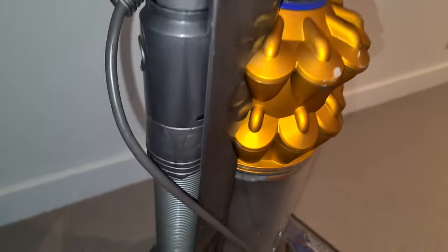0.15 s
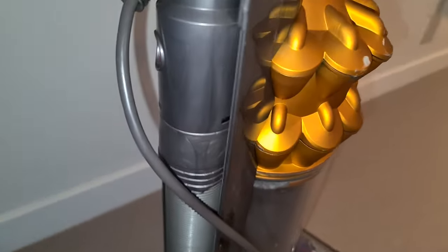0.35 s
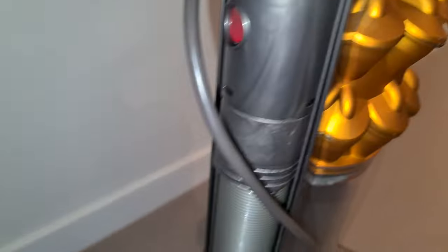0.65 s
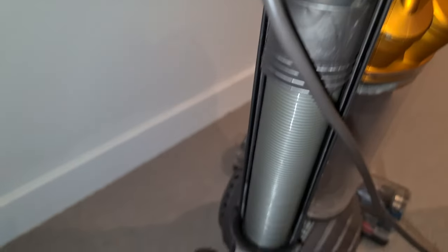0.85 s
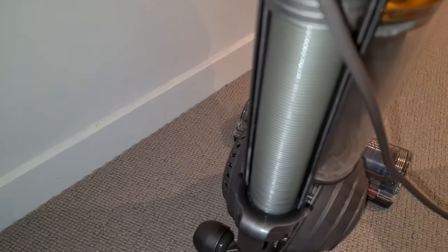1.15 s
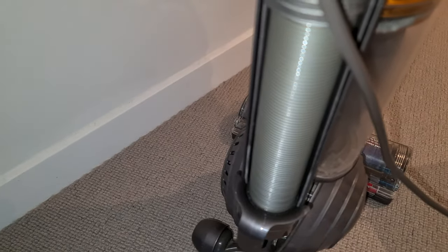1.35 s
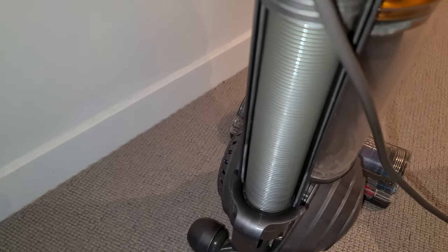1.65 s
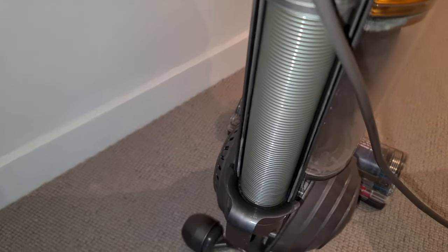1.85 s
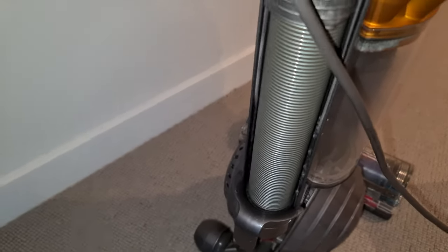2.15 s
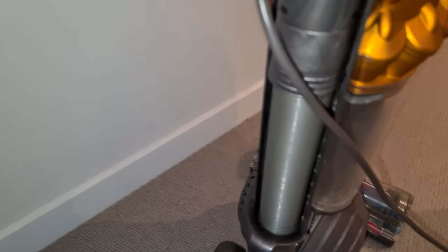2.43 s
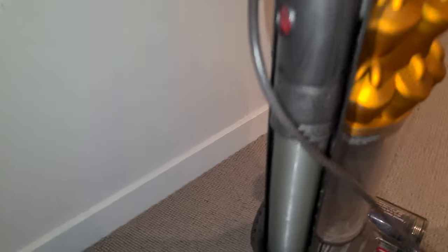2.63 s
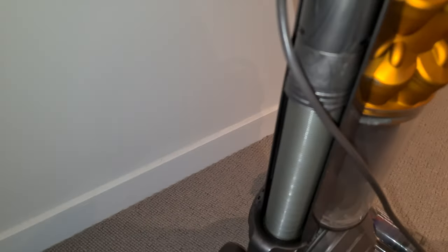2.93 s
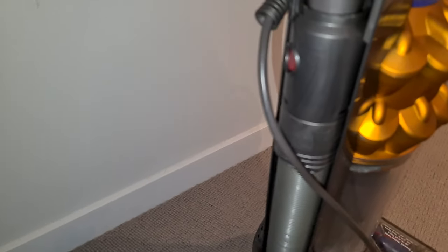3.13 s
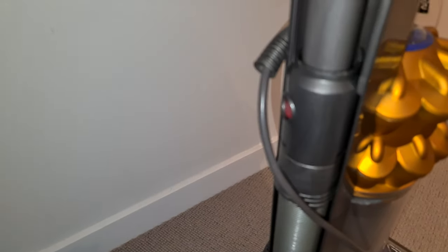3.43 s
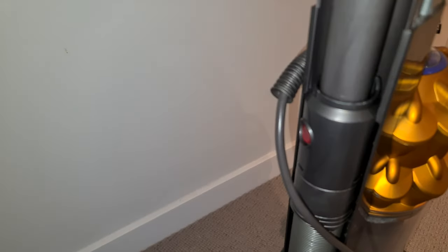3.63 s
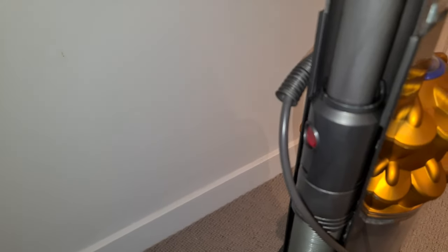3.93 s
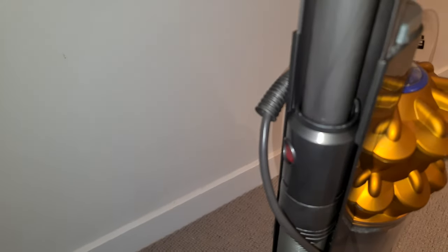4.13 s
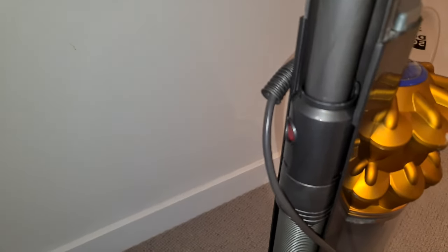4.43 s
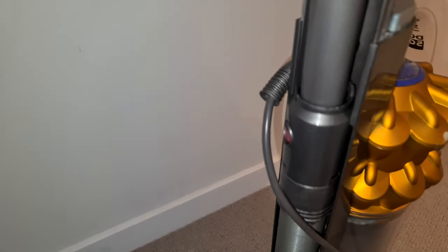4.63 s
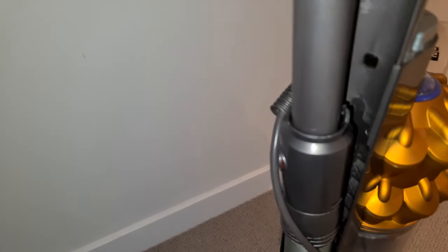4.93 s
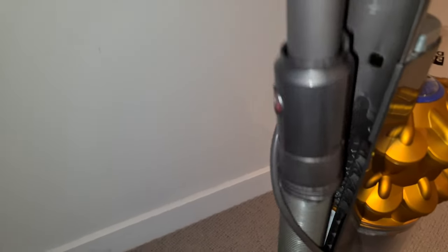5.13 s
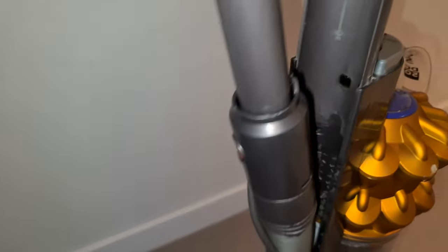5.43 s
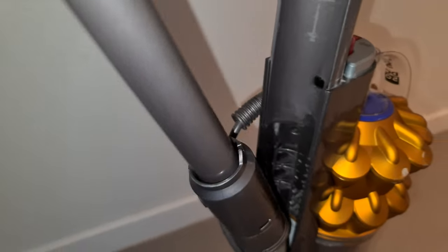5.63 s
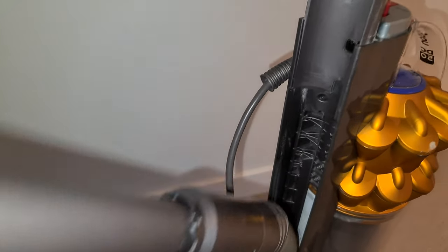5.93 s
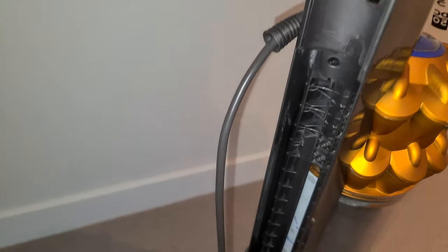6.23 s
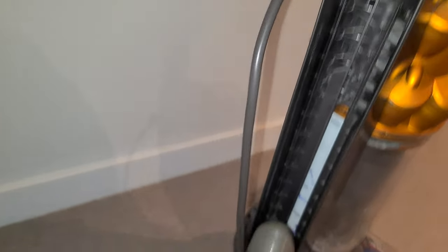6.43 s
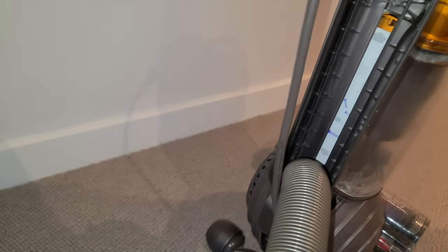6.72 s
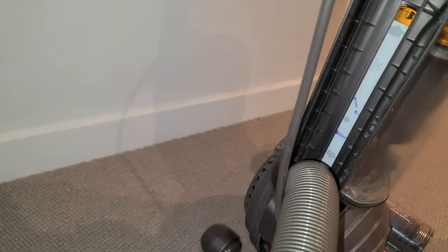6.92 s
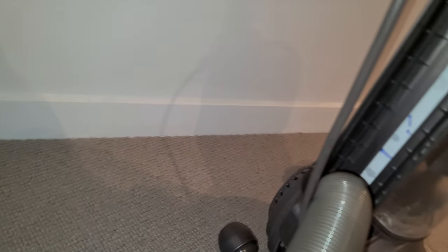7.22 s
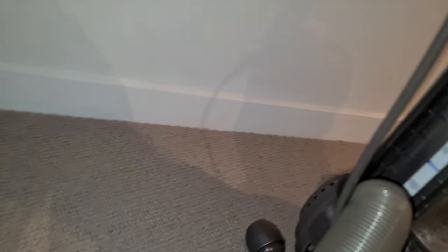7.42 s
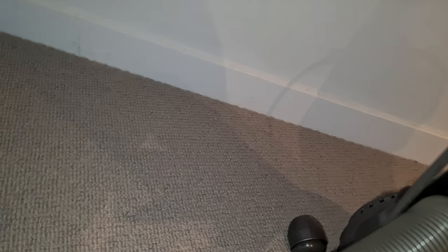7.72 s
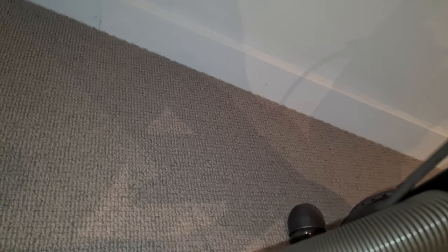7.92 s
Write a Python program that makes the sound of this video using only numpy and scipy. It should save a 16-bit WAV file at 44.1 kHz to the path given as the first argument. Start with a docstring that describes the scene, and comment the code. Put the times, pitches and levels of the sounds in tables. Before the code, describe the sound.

A switched-off upright vacuum cleaner is handled close to two microphones in a small carpeted room, with a faint low rumble and wavering hum throughout. From 0 to 2 seconds there are only sparse light plastic ticks and barely audible rubs. At about 2.1 the ribbed hose slides with a dry, grainy hiss lasting under half a second, with clicks, ending in sharp knocks near 2.4 to 2.5. Between 2.7 and 3.1 comes the busiest burst: hard hollow clacks, short scraping strokes, shuddering housing and low booms. Small ticks and soft rubs continue from 3.2 to 4.5. Around 4.55 to 4.6 a catch snaps open in a rapid cluster of bright cracks, ringing and rattling. At 5.15 a heavy plastic clunk booms and chatters briefly. Scattered light taps follow until about 7.5, then mostly quiet hum to 8 seconds.

```python
"""The wand of an upright vacuum cleaner, handled close to two microphones in a small carpeted room, motor off.
It scrapes and clunks in its plastic channel, unlatches and comes free: noise-driven knocks ring housing and tube.
The ribbed hose, nearest and driest, slides with a hiss of stick-slip noise.
Loose parts tick between the moves and chatter after jolts; the bin booms as short low sines.
Behind it lie a low rumble of filtered noise and two wavering hums."""
import sys
import numpy as np
from scipy import signal
from scipy.fft import rfft, irfft, next_fast_len
from scipy.io import wavfile

SR = 44100
rng = np.random.default_rng(int(sys.argv[2]) if len(sys.argv) > 2 else 0)


def digitize_waveform(pressure):
    """Quantize a signal to 16-bit integers and store it at the path in sys.argv[1].

    Rows of a 2-D input are taken as channels; values are limited to [-1, 1].
    """
    field = np.atleast_2d(pressure).T
    bounded = np.clip(field, -1, 1)
    quanta = np.round(bounded * 32767).astype(np.int16)
    wavfile.write(sys.argv[1], SR, quanta)


N = 355887
TIME = np.arange(N) / SR

# Event levels below are relative: each layer's gain and the room come later. Positive pan_db leans left.
# steady rumble: pitch_hz, density_db (per Hz)
RUMBLE_COLOUR = [(20, -13), (50, 0), (80, 0), (115, -6), (160, -9), (250, -18), (400, -27.5), (700, -36),
                 (1500, -41), (4000, -46.5), (6500, -62), (16000, -65)]
RUMBLE_DB, HUM_HZ, HUM_DB = -55.5, 100.9, -54.5  # levels before the swell
# slow swell of the low background: time_s, gain_db
RUMBLE_SWELL = [(0, 0.5), (1.5, 2), (2.8, 3), (3.4, -5), (4.5, -2.5), (6.2, -3.5), (6.9, 1.5), (8.1, -0.5)]
# likeness of the two microphones: pitch_hz, likeness (0-1)
MIC_LIKENESS = [(60, 1), (200, 0.7), (500, 0.8), (1200, 0.4), (3000, 0.4), (12000, 0.25)]
# decay of the room: pitch_hz, t60_s
ROOM_T60 = [(100, .35), (300, .45), (1000, .4), (3500, .46), (7000, .38), (13000, .33)]
# strength of the reverberation: pitch_hz, gain_db
ROOM_COLOUR = [(100, -12.5), (300, -5), (1000, -11), (2200, -9), (4200, -14.5), (7000, -11), (13000, -16.5)]
# modes of the hollow housing: pitch_hz, level_db, t60_s
HOUSING_MODES = [(182, -6, 0.13), (242, -3, .35), (302.2, -7, .3), (394.7, -8, .3), (587, -8, .2),
                 (750, -10, 0.23), (809, -4.5, 0.086), (984, -5, .25), (1230, -4.5, 0.14),
                 (1290, -6.5, 0.04), (1520, -4.5, .12), (1590, -6.5, .22), (1896, -4, 0.17)]
# modes of the wand's tube: pitch_hz, level_db, t60_s
TUBE_MODES = [(1772, -11, 0.35), (2100, -4.5, 0.36), (2190, -4.5, 0.28), (2241, -2.5, 0.34),
              (2410, -1.5, 0.08), (2780, -5.5, 0.3), (3030, -3.5, 0.44), (3230, -1, .2), (3310, 0, 0.083),
              (3515, -1.5, 0.061), (3640, 5.5, 0.096), (3680, -1, 0.16), (3951, -0.5, 0.017),
              (4090, 4, 0.13), (4220, -2, 0.095), (4740, -6, .24)]
# how freely the tube rings, most just before the catch opens: time_s, gain_db
TUBE_FREEDOM = [(0, -2), (4.5, 8), (4.61, 3), (8.1, 4.5)]
# hose and cord rubbing on the housing: middle_s, length_s (between -10 dB points), level_db
RUBS = [(0.36, .05, -60), (0.581, 0.034, -46.5), (1.038, .04, -68), (2.7, .18, -47.5), (3.432, .18, -60.5),
        (3.697, .07, -55.5), (3.88, .12, -56.5), (4.104, .08, -66), (4.501, .12, -52.5), (4.6, .09, -33.5),
        (4.96, .08, -52.5), (5.327, .2, -54), (5.746, 0.11, -51.5), (6.016, .14, -53), (6.252, 0.21, -61),
        (6.61, .04, -68)]
# colour of those rubs: pitch_hz, density_db (per Hz)
RUB_COLOUR = [(200, -15), (600, 2), (1000, 2.5), (1700, 1), (3500, -5), (5500, -20.5), (8000, -33),
              (16000, -39.5)]
# loose parts chatter after a jolt: start_s, level_db, t60_s
RATTLES = [(4.612, -33, .32), (5.154, -24, 0.17)]
# colour of the chatter: pitch_hz, density_db (per Hz)
RATTLE_COLOUR = [(200, -21), (450, -6.5), (800, -7), (1500, -4), (2200, 2), (3200, 0), (4200, 0.5),
                 (5200, -6), (8000, -21), (11000, -17.5), (16000, -20.5)]
# faint jiggling of loose parts: start_s, end_s, level_db, crack_db (relative to level), pitch_hz
JIGGLES = [(3.415, 3.66, -61.5, -16, 1144), (4.096, 4.13, -56.5, -19, 1100), (5.822, 6.0, -64, -11, 1520),
           (6.206, 6.26, -66, 7, 1396)]
JIGGLE_GAP_S = .055
# light ticks of loose parts: start_s, level_db, crack_db (relative to level), pitch_hz
TICKS = [(0.1445, -51.5, -14, 1506), (0.1635, -55.5, -5, 1120), (0.4062, -50.5, -9, 1530),
         (0.5784, -64.5, -4, 2340), (0.75, -46.5, -34, 1000), (0.956, -53.5, -11.5, 1590),
         (1.114, -61.5, -18, 780), (1.2817, -45.5, -11.5, 1880), (1.3693, -55.5, -21, 1730),
         (1.997, -61, -23, 1320), (2.079, -42, -7.5, 1890), (2.6438, -42, -9, 1300),
         (2.6985, -42.5, -31, 1110), (2.717, -36, -26, 1040), (3.1752, -36, -8, 1200),
         (3.224, -40.5, -11, 2200), (3.694, -52, -9, 1320), (3.8491, -54.5, -17.5, 840),
         (3.9174, -43.5, -20.5, 1095), (3.9358, -50.5, -31, 1040), (4.3215, -51.5, -0.5, 1610),
         (4.4253, -47, 6.5, 1195), (4.433, -44, -12, 1132), (4.4687, -43, -23, 960),
         (4.5137, -40.5, -4.5, 1020), (4.74, -47.5, -1.5, 1880), (4.9318, -51, -10.5, 1275),
         (4.9856, -49.5, -5.5, 693), (5.108, -43, 0.5, 1470), (5.341, -70, 16, 1675),
         (5.3638, -42.5, -8, 1844), (5.5752, -63.5, -1.5, 1590), (5.6139, -59, 6, 1590),
         (5.6333, -53.5, 0.5, 1580), (5.7035, -55.5, 6, 990), (5.733, -39, 0.5, 1620),
         (6.0355, -40, -9.5, 1750), (6.2807, -46.5, -9.5, 1300), (6.5803, -87.5, 15, 1920),
         (6.7246, -47, -7, 1770), (7.067, -56.5, -1, 1596), (7.367, -84.5, 18, 1600),
         (7.4023, -58, -1, 1575), (7.5039, -47.5, -6, 1886)]
SOFT_CRACK_DB = -29.5  # with this much crack a tick is a soft, narrow tock; at 0 dB it is hard and wide
# heavy shoves that make the dust bin boom: start_s, level_db (before the swell and decay), pitch_hz, t60_s
BOOMS = [(2.49, -32, 215, 0.068), (2.738, -26.5, 135, 0.122), (3.084, -23, 218, .14),
         (4.609, -31, 172, 0.11), (5.149, -17, 157, 0.094)]
# slides of the hose: start_s, speeding_up_s, steady_s, release_t60_s, level_db, brightness_db
SLIDES = [(.42, .14, .01, .1, -68.5, 4.5), (2.065, 0.09, .3, .085, -28.5, -1.5),
          (2.16, .045, .01, .15, -38.5, 6), (4.95, 0.16, .05, .17, -47, -4), (5.85, .38, .03, .8, -62, -18)]
# colour of the hose's hiss: pitch_hz, density_db (per Hz)
HOSE_COLOUR = [(150, -30.5), (500, -18), (1150, -1.5), (1550, -5.5), (2100, -1), (3500, -3), (5600, -2.5),
               (7900, -15), (10000, -6.5), (12400, -5), (16000, -13.5)]
# strokes of the wand in its channel: start_s, speeding_up_s, steady_s, scrape_db, judder_db
STROKES = [(2.697, 0.063, 0.0088, -22.5, -30), (2.846, 0.049, 0.072, -31, -45),
           (3.056, 0.051, 0.002, -25, -34.5)]
STROKE_T60_S = .25
# colour of the wand's scrape: pitch_hz, density_db (per Hz)
WAND_COLOUR = [(150, -24), (450, -4.5), (800, 0), (1500, -0.5), (2600, 0), (3500, -4.5), (6000, -7),
               (8000, -23), (10500, -16.5), (16000, -26)]
# colour of the housing's judder: pitch_hz, density_db (per Hz)
JUDDER_COLOUR = [(30, -13.5), (70, 3.5), (130, -1.5), (225, 4.5), (280, -1), (420, -7), (800, -21.5),
                 (2000, -63)]
# hard knocks of plastic on plastic:
# start_s, level_db, thud_db, crack_db (both relative to level), pitch_hz, t60_s, pan_db
KNOCKS = [(2.118, -32, -14.5, 7, 1750, .013, -2.5), (2.128, -29, -17.5, -10.5, 2010, .026, -8.5),
          (2.324, -34.5, -11, -2.5, 1960, .038, 1.5), (2.3971, -18, -21.5, -9.5, 1166, .029, -3),
          (2.421, -24.5, -23.5, -6, 1976, .073, 1.5), (2.4893, -19.5, -11.5, -13.5, 1092, .085, -4),
          (2.734, -24.5, -7, -11.5, 1313, .08, -0.5), (2.752, -26.5, -8, 2, 1600, .039, -5.5),
          (2.812, -27, -17.5, -3, 1250, .029, -1), (2.8626, -27.5, -18.5, 2, 2200, .15, -3.5),
          (2.897, -19.5, -18, -6, 808, .049, -0.5), (2.914, -27.5, -10, 11, 1830, .034, 1.5),
          (2.918, -15, -23, 1, 1864, .035, 2), (3.096, -27.5, -10.5, -13, 1610, .046, 0),
          (3.115, -28, -24, 1, 854, .055, 16), (4.529, -34.5, -16.5, -4, 2190, .015, 0),
          (4.534, -34.5, -12, -13.5, 2170, .015, -4), (4.555, -36, -18, -3, 1971, .03, -5),
          (4.5601, -20.5, -22, -2.5, 2160, .02, -6.5), (4.5815, -22, -14.5, -1, 1680, .04, -1),
          (4.609, -24, -31, 9.5, 1400, .024, -2), (4.611, -16.5, -31.5, -9.5, 1760, .023, -2.5),
          (5.144, -25.5, -15, 1, 2090, .013, -0.5), (5.1488, -23.5, -4, -0.5, 784, .024, -5),
          (5.1525, -19, -9, 3, 1570, .016, -1), (5.1622, -26, -12.5, -10, 834, .033, 1.5)]
# ranges in which a blow sounds: low_hz, high_hz
THUD, CRACK, SNAP = (120, 550), (2200, 4700), (9400, 15500)
SNAP_PER_CRACK = 1.7  # harder contacts snap more: dB of snap per dB of crack
EDGE_HZ = 16100  # upper band limit


def amp(db):
    """Decibels to gain."""
    return 10 ** (np.asarray(db) / 20)


def unit(x):
    """Scales to rms 1."""
    return x / np.sqrt(np.mean(x ** 2) + 1e-20)


def read(points, hz):
    """Reads a spectrum on a log-frequency axis."""
    f, value = np.transpose(points)
    return np.interp(np.log(hz + 1), np.log(f + 1), value)


def level(points):
    """Gain along a dB curve, all but silent outside it."""
    s, db = np.transpose(points)
    return amp(np.interp(TIME, s, db, left=-150, right=-150))


def decay(t, t60):
    """Exponential decay that falls 60 dB in t60 seconds."""
    return np.exp(-np.log(1000) * t / t60)


def sides(pan_db):
    """Left and right gains of equal total power."""
    return unit(amp([[pan_db / 2], [-pan_db / 2]]))


def add(mix, s, sound):
    """Adds a stereo sound at a time in seconds."""
    part = mix[:, round(s * SR):][:, :sound.shape[1]]
    part += sound[:, :part.shape[1]]


def pair(x):
    """Two unrelated signals as two close microphones hear them: most alike in the bass."""
    size = x.shape[1]
    a, b = rfft(x)
    same = np.clip(read(MIC_LIKENESS, np.fft.rfftfreq(size, 1 / SR)), 0, 1)
    return irfft(np.array([a, same * a + np.sqrt(1 - same ** 2) * b]), size)


def coloured(x, colour):
    """Gives a stereo excitation a spectrum, at rms 1."""
    size = next_fast_len(N)
    spectrum = rfft(pair(np.pad(x, ((0, 0), (0, size - N)))))
    gain = amp(read(colour, np.fft.rfftfreq(size, 1 / SR)))
    return unit(irfft(spectrum * gain, size)[:, :N])


def low_pass(x, hz, order=1):
    """Causal low-pass."""
    return signal.sosfilt(signal.butter(order, hz, fs=SR, output="sos"), x)


def band(x, edges):
    """Causal band-pass."""
    edges = np.clip(edges, 20, SR / 2 - 100)
    return signal.sosfilt(signal.butter(3, edges, "bandpass", fs=SR, output="sos"), x)


def slips(per_s, spread_db):
    """Stick-slip friction: countless tiny releases whose strength is redrawn per_s times a second."""
    knots = np.arange(0, TIME[-1] + 1, 1 / per_s)
    strength = np.clip(rng.standard_normal(len(knots)), -2, 2)
    grip = np.interp(TIME, knots, strength)
    return rng.standard_normal((2, N)) * amp(spread_db * grip)


def speed(start, rise_s, steady_s, t60, curve=2.2):
    """A sliding part gathers speed, holds it and runs out."""
    t = TIME - start
    release = np.clip((t - rise_s - steady_s) / t60, 0, 2)
    return np.clip(t / rise_s, 0, 1) ** curve * amp(-60 * release)


def blow(s, db, thud_db, crack_db, snap_db, hz, t60, pan_db, rise_s, graze_db,
         tone=0.56, below=0.58, above=1.533,
         thud_ring=1.2, crack_ring=0.92, snap_ring=.5, treble_pan_db=-6.0):
    """One contact: parts graze, then hit; noise bands stand for damped wall modes, treble dying first."""
    t = np.arange(-882, 6144) / SR  # the graze begins 20 ms ahead of the hit
    span = np.sqrt(.01 * SR / len(t))  # refers the level to 10 ms
    after = np.maximum(t, 0)
    push = 1 - np.exp(-after / max(rise_s, 1e-5))
    graze = amp(graze_db) * np.exp(-abs(t) / .005)
    walls = pair(rng.choice([-1., 1.], (2, len(t))))

    def fade(share):
        return push * decay(after, max(t60 * share, 1e-3))

    def ring(edges, share):
        return unit(band(walls * (fade(share) + graze), edges))

    main = unit(np.sin(2 * np.pi * hz * t) * fade(0.94))
    body = ring((hz * min(below, .9), hz * max(above, 1.1)), 1)
    low = unit(body + tone * main) + amp(thud_db) * ring(THUD, thud_ring)
    high = amp(crack_db) * ring(CRACK, crack_ring) + amp(snap_db) * ring(SNAP, snap_ring)
    spread = low * sides(-treble_pan_db / 2) + high * sides(treble_pan_db)
    return s + t[0], amp(db) * span * sides(pan_db) * spread


def hum(hz, waver, waver_hz):
    """A sine whose strength and phase drift slowly, the same in both channels."""
    drift = unit(low_pass(rng.standard_normal((2, N)), waver_hz, order=2))
    wander = 1 + waver * (drift[0] + 1j * drift[1])
    tone = (wander * np.exp(2j * np.pi * hz * TIME)).real
    return unit(tone)


def background(waver=.6, waver_hz=7, drone_hz=53, drone_db=-60):
    """Low rumble of the house with a wavering hum and a fainter drone about an octave below."""
    rumble = amp(RUMBLE_DB) * coloured(rng.standard_normal((2, N)), RUMBLE_COLOUR)
    low = low_pass(rumble, 200)
    hums = amp(HUM_DB) * hum(HUM_HZ, waver, waver_hz) + amp(drone_db) * hum(drone_hz, waver, waver_hz)
    return rumble - low + level(RUMBLE_SWELL) * (low + hums)


def room(x, first_s=0.00077):
    """Dense reflections from near walls, each band dying at its own speed."""
    taps = rng.standard_normal((2, SR)) * (rng.random(SR) < 4000 / SR)  # about 4000 echoes a second
    hz, t, z = signal.stft(unit(pair(taps)), SR, nperseg=256)
    t60 = read(ROOM_T60, hz)[:, None]
    even_energy = np.sqrt(2 * np.log(1000) / (t60 * SR))  # long decays get no louder
    z = z * amp(read(ROOM_COLOUR, hz))[:, None] * decay(t, t60) * even_energy
    tail = signal.istft(z, SR, nperseg=256)[1][:, :SR]
    tail = tail * np.clip(TIME[:SR] / first_s - 1, 0, 1)
    return x + signal.fftconvolve(x, tail, axes=1)[:, :N]


def ringing(x, modes):
    """Contacts ring an uneven shell: each mode splits in three, its phase apart at each microphone."""
    t = np.arange(SR // 2) / SR
    ring = np.zeros((2, len(t)))
    for k, (hz, db, t60) in enumerate(modes):
        fade = decay(t, t60)
        phase = np.arccos(np.clip(read(MIC_LIKENESS, hz), 0, 1))
        apart = phase * np.array([[.5], [-.5]]) * (-1) ** k
        split = .017 * min(hz / 3000, 1)  # higher modes split wider
        cluster = sum(np.sin(2 * np.pi * hz * (1 + side * split) * t + apart + side * (k + 1))
                      for side in (-1, 0, 1))
        ring += amp(db) * fade / fade.sum() * cluster
    return signal.oaconvolve(x, ring, axes=1)[:, :N]


def flex(gain_db=-6.5, pan_db=-1, ends_db=-10):
    """Hose and cord rustle faintly against the plastic; each rub swells and fades evenly."""
    pressure = np.zeros(N)
    for middle, length, db in RUBS:
        away = np.minimum(2 * abs(TIME - middle) / length, 4)
        pressure += amp(db + ends_db * away ** 2)
    return amp(gain_db) * coloured(slips(140, 5), RUB_COLOUR) * pressure * sides(pan_db)


def jiggles(spread_db=3, spread_octaves=0.42):
    """Faint ticks at uneven intervals, each a little different in strength and pitch."""
    rows = []
    for start, end, db, crack_db, hz in JIGGLES:
        for s in np.arange(start, end, JIGGLE_GAP_S):
            late, strong, high = rng.uniform(-1, 1, 3)
            rows.append((s + late * JIGGLE_GAP_S / 2, db + spread_db * strong,
                         crack_db, hz * 2 ** (spread_octaves * high)))
    return rows


def ticks(gain_db=1.5, thud_db=-11, snap_db=-17, pan_db=-3.0, t60=.025, rise_s=.0002, graze_db=-26,
          bounce_db=-12, bounce_s=0.0059, soft_tone=.7, soft_octaves=.35, hard_octaves=0.97):
    """Cord, catch and hose cuff tap the housing and bounce once; harder taps ring a wider range."""
    out = np.zeros((2, N))
    for s, db, crack_db, hz in [*TICKS, *jiggles()]:
        gap_s = rng.uniform(.6, 1.4) * bounce_s
        top_db = snap_db + SNAP_PER_CRACK * crack_db
        soft = np.clip(crack_db / SOFT_CRACK_DB, 0, 1)
        width = 2 ** (soft * soft_octaves + (1 - soft) * hard_octaves)
        for delay, drop_db in ((0, 0), (gap_s, bounce_db)):
            add(out, *blow(s + delay, db + gain_db + drop_db, thud_db, crack_db, top_db, hz, t60,
                           pan_db, rise_s, graze_db, soft * soft_tone, 1 / width, width))
    return out


def rattle(gain_db=-2, pan_db=-3):
    """A fine, uneven chatter of plastic that dies away after each jolt."""
    shaking = np.zeros(N)
    for s, db, t60 in RATTLES:
        shaking += (TIME > s) * amp(db - 60 * np.clip((TIME - s) / t60, 0, 2))
    return amp(gain_db) * coloured(slips(300, 3.5), RATTLE_COLOUR) * shaking * sides(pan_db)


def booms(rise_s=0.0072, pan_db=2):
    """The lowest mode of the bin, a sine, swells quickly and dies away."""
    out = np.zeros((2, N))
    t = np.arange(SR // 4) / SR
    for s, db, hz, t60 in BOOMS:
        swell = (1 - np.exp(-t / rise_s)) * decay(t, t60)
        add(out, s, amp(db) * sides(pan_db) * swell * np.sin(2 * np.pi * hz * t))
    return out


def hose(gain_db=-.5, pan_db=-2, fizz_pan_db=-9, split_hz=3000, brightening=.3):
    """Ribs rush past the rim of the channel: a dense hiss that brightens with speed."""
    rub = coloured(slips(450, 1.8), HOSE_COLOUR)
    dull = low_pass(rub, split_hz)
    bright = rub - dull
    body, fizz = np.zeros((2, N))
    for *motion, db, bright_db in SLIDES:
        pace = speed(*motion)
        body += amp(db) * pace
        fizz += amp(db + bright_db) * pace ** (1 + brightening)
    return amp(gain_db) * (dull * body * sides(pan_db) + bright * fizz * sides(fizz_pan_db))


def wand(scrape_db=-1, judder_db=0, pan_db=-5.5):
    """The tube sticks and slips along its channel and shakes the whole housing."""
    rubbing, shaking = np.zeros((2, N))
    for start, rise_s, steady_s, rub_db, shake_db in STROKES:
        pace = speed(start, rise_s, steady_s, STROKE_T60_S)
        rubbing += amp(rub_db) * pace
        shaking += amp(shake_db) * pace
    scrape = coloured(slips(260, 2.8), WAND_COLOUR) * rubbing * sides(pan_db)
    judder = coloured(slips(120, 1.2), JUDDER_COLOUR) * shaking
    return amp(scrape_db) * scrape + amp(judder_db) * judder


def knocks(gain_db=1, snap_db=-14, rise_s=0.00046, graze_db=-24):
    """The wand hits its stops and the catch lets go."""
    out = np.zeros((2, N))
    for s, db, thud_db, crack_db, hz, t60, pan_db in KNOCKS:
        top_db = snap_db + SNAP_PER_CRACK * crack_db
        add(out, *blow(s, db + gain_db, thud_db, crack_db, top_db, hz, t60, pan_db, rise_s, graze_db))
    return out


def scene(housing_db=-3.5, tube_db=-4, light_db=-14, tube_pan_db=-3, hose_far=0.48):
    """Hard contacts ring housing and tube far more than light ones; the hose is closest and so the driest."""
    hard = knocks() + wand()
    hiss = hose()
    light = ticks() + flex() + hose_far * hiss
    shake = hard + amp(light_db) * light
    housing = amp(housing_db) * ringing(shake, HOUSING_MODES)
    tube = amp(tube_db) * ringing(shake * level(TUBE_FREEDOM), TUBE_MODES) * sides(tube_pan_db)
    in_room = room(hard + light + housing + tube + booms() + rattle())
    return in_room + (1 - hose_far) * hiss + background()


def record(dry, ceiling=0.65):
    """The loudest peaks are rounded softly; then the band limit."""
    rounded = ceiling * np.tanh(dry / ceiling)
    edge = signal.firwin(255, EDGE_HZ, window=("kaiser", 8), fs=SR)
    return signal.oaconvolve(rounded, edge[None], "same", axes=1)


dry = scene()
out = record(dry)
digitize_waveform(out)
```